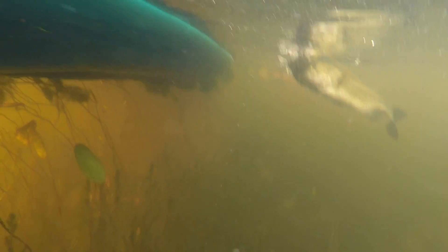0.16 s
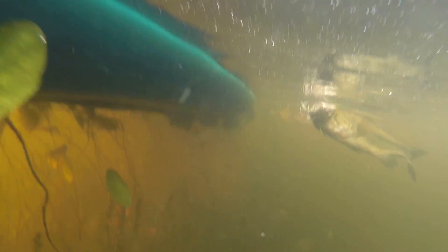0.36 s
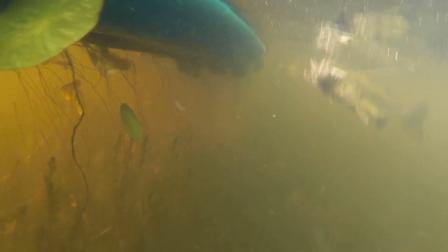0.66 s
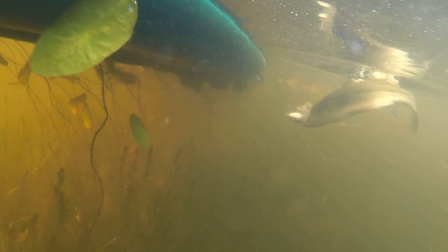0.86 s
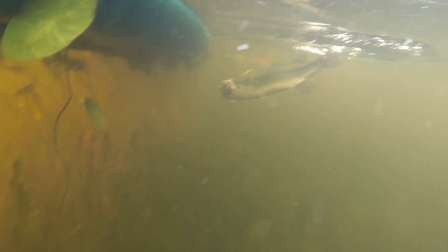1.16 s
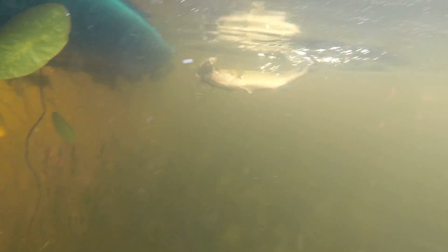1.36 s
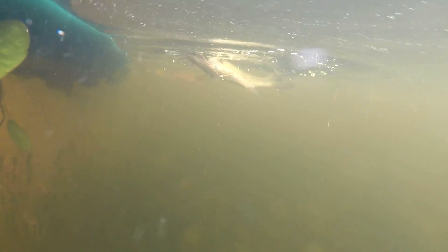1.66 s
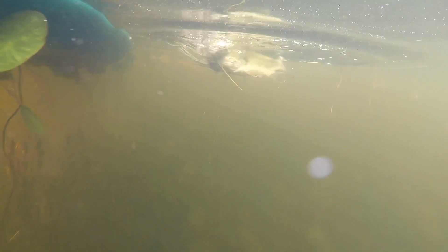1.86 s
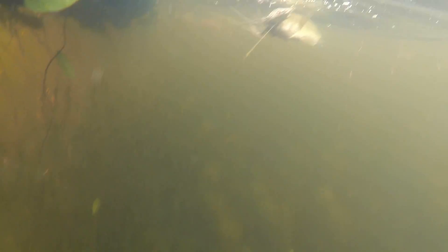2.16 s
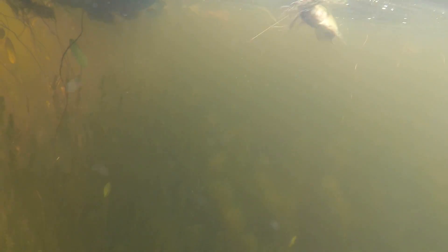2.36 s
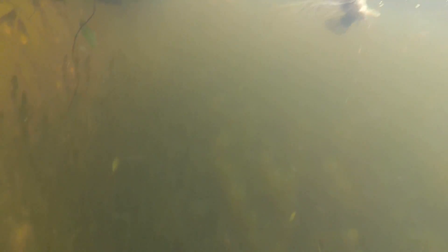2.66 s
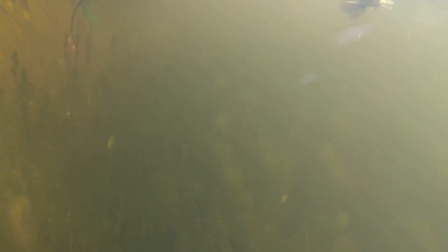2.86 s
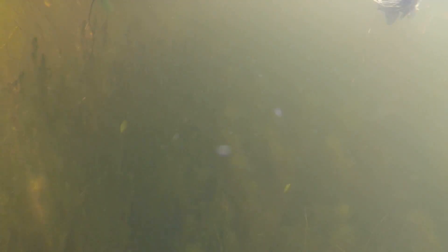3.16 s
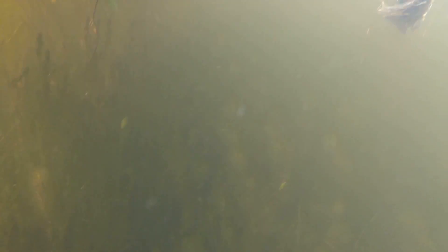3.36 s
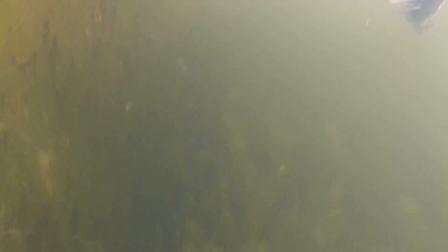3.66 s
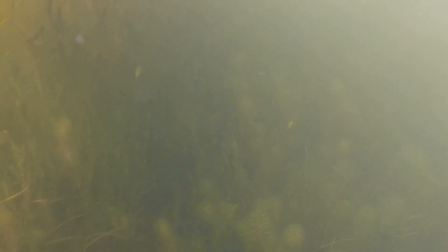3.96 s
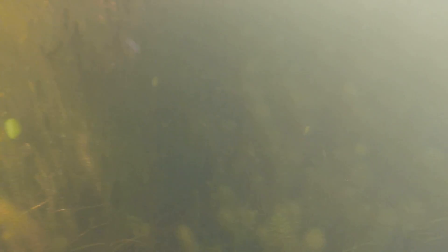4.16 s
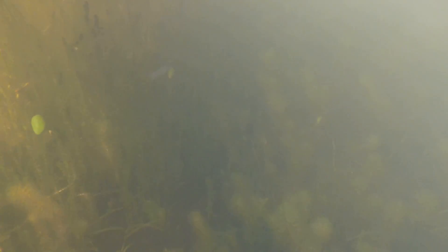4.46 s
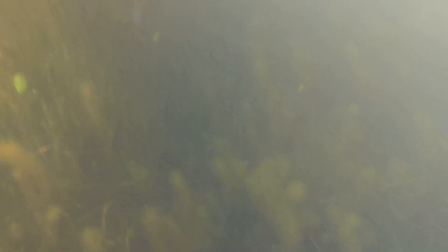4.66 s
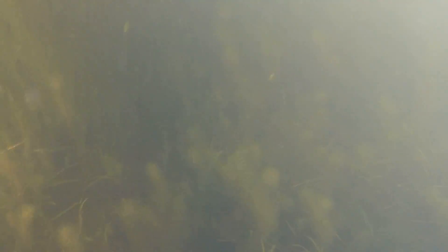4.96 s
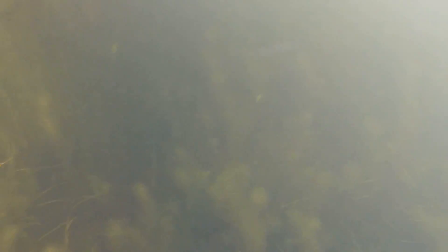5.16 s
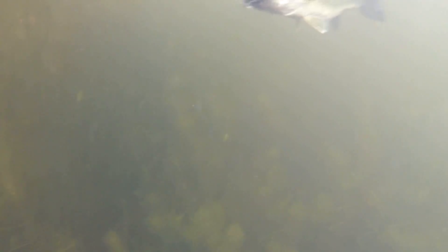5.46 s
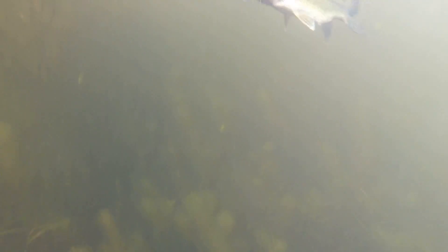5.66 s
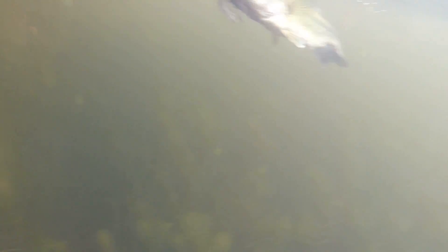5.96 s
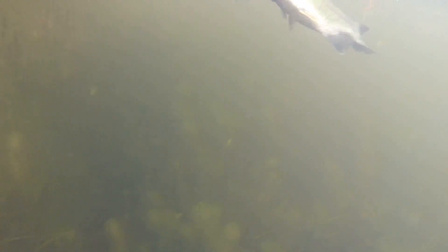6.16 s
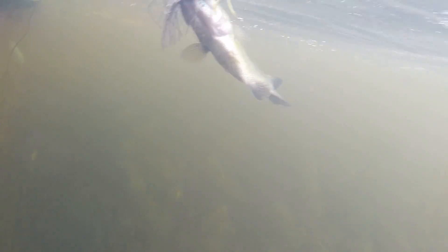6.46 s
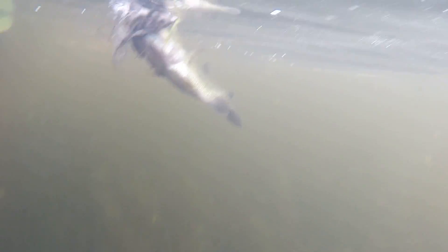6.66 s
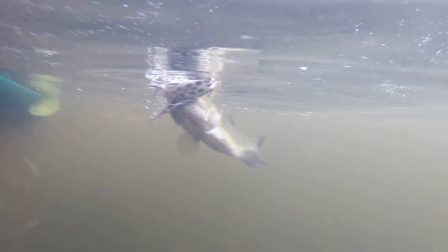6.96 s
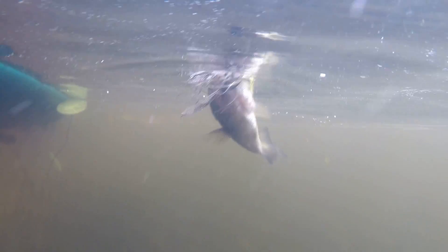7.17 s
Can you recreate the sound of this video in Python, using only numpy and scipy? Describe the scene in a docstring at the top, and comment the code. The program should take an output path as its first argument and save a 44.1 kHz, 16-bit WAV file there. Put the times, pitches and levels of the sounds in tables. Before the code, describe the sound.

A microphone sealed in a plastic housing just below a lake's surface, beside a kayak. A hooked fish thrashes at first with quick fizzy splashes, a hard click and chirping bubbles over low water rumble. It calms, then short ringing notches and sharp clicks rattle the housing, gurgles swirl, a hard snap rings, and a deep surge comes near the end.

```python
"""A camera in a plastic housing is held under a lake's surface beside a kayak while a hooked fish thrashes.
Throughout, eddies rumble past the housing (shaped noise) over faint hiss and a thin, throbbing whine.
Splashes fizz (swarms of tiny ringing bubbles with spray), hard clicks ring the housing, bubbles chirp,
gurgles swirl, surges rock it and soft knocks dent it; then the mount slips in short ringing notches.
Late on, faint ticks (damped modes) lead to one hard snap that rings on; a last deep surge follows."""
import sys
import numpy as np
from scipy import signal
from scipy.fft import rfft, irfft
from scipy.io import wavfile
from scipy.ndimage import uniform_filter1d

SR = 44100
rng = np.random.default_rng(int(sys.argv[2]) if len(sys.argv) > 2 else 0)


def store_pcm(level_fs):
    """Save levels as 16-bit WAV."""
    pcm = np.round(np.clip(level_fs, -1, 1) * 32767).astype(np.int16)
    wavfile.write(sys.argv[1], SR, np.atleast_2d(pcm).T)


N = 322841
T = np.arange(N) / SR  # time in the scene, s
AGE = np.arange(SR // 4) / SR  # time since an event began, s


def undb(db):
    """Amplitude ratio from level: 20 dB is a factor of ten."""
    return 10 ** (np.asarray(db) / 20)


def unit(x):
    """Normalization by the root mean square, to rms 1."""
    return x / np.sqrt(np.mean(x ** 2))


def add(out, s, x):
    """Linear superposition: sound x joins the mix at time s."""
    i = max(int(s * SR), 0)
    out[i:i + len(x)] += x[:max(len(out) - i, 0)]


def colour(x, points, tilt_db=0):
    """Spectral filtering: a curve over log frequency plus a tilt in dB per octave; rms 1."""
    octave = np.log2(np.maximum(np.fft.rfftfreq(len(x), 1 / SR), 1))
    hz, db = np.transpose(points)
    # the tilt starts at 256 Hz, octave 8
    gain_db = np.interp(octave, np.log2(hz), db) + tilt_db * np.maximum(octave - 8, 0)
    bass_cut = np.minimum(2 ** octave / hz[0], 1) ** 2  # 12 dB per octave below the first point
    return unit(irfft(rfft(x) * undb(gain_db) * bass_cut, len(x)))


def band(x, hz, width_hz):
    """Two-pole resonance: a band-pass whose Q is centre over width."""
    w = 2 * np.pi * hz / SR
    a = np.sin(w) * width_hz / hz / 2
    return signal.lfilter([a, 0, -a], [1 + a, -2 * np.cos(w), 1 - a], x)


def walk(rate):
    """Band-limited random drift: held noise, drawn rate times a second, smoothed by a moving mean."""
    k = max(int(SR / rate), 1)
    held = np.repeat(rng.standard_normal(N // k + 1), k)
    return uniform_filter1d(held, k)[:N]


def fade(t60):
    """Exponential decay: linear damping loses 60 dB in t60 seconds."""
    return np.exp(-np.log(1000) * AGE / t60)


def ring(hz, t60, glide=0):
    """One damped mode: a decaying sine whose pitch moves by the share glide over its t60."""
    bend = 1 + glide * np.minimum(AGE / t60, 1) / 2
    return fade(t60) * np.sin(2 * np.pi * hz * AGE * bend)


def push(contact):
    """Soft contact: a smooth pressure pulse that lasts contact seconds."""
    return np.sin(np.pi * np.minimum(AGE / contact, 1)) ** 2


def flow(rumble_db=6):
    """Turbulent pressure: eddies on the housing make a low rumble that follows its motion."""
    # push of the water past the housing: (time [s], level before rumble_db is added [dB])
    flow_push = [(0.0, -35), (0.51, -38), (0.67, -33.5), (0.81, -42.5), (2.1, -46), (2.42, -53.5),
                 (2.83, -47.5), (3.34, -51), (4.08, -44), (4.32, -42.5), (4.44, -37.5), (4.71, -45.5),
                 (5.36, -45.5), (5.75, -40.5), (6.16, -42.5), (6.63, -43), (6.77, -39.5), (7.32, -45.5)]
    # spectrum of the eddies: (frequency [Hz], relative level per Hz [dB])
    eddy_spectrum = [(8.8, -31.5), (15, 7), (27, 4.5), (37, -1.5), (51, -3), (119, -20.5), (226, -35.5),
                     (291, -34), (327, -36), (500, -42.5), (650, -64.5), (1100, -120)]
    eddies = colour(rng.standard_normal(N), eddy_spectrum)
    eddies /= np.sqrt(uniform_filter1d(eddies ** 2, size=SR // 8))  # even out the running rms
    return eddies * undb(rumble_db + np.interp(T, *np.transpose(flow_push)))


def floor(hiss_db=-57.5, whine_hz=13906, whine_db=-71, waver_hz=1, frame_hz=60, throb=0.63, swing=.45, fuzz_db=-78):
    """Modulation: over steady hiss, a thin whine throbs and swings in phase with every picture frame."""
    # spectrum of the hiss: (frequency [Hz], relative level per Hz [dB])
    hiss_spectrum = [(150, -84), (300, -88.5), (600, -91.5), (1000, -95), (2200, -100), (3200, -99),
                     (4300, -104.5), (5100, -102.5), (6200, -108), (9300, -111), (10200, -108),
                     (11800, -113), (13700, -111), (14500, -113)]
    hiss = undb(hiss_db) * colour(rng.standard_normal(N), hiss_spectrum)
    frame = 2 * np.pi * frame_hz * T
    carrier = 2 * np.pi * np.cumsum(whine_hz + waver_hz * walk(60)) / SR
    phase_swing = swing * np.sin(frame) + swing / 2 * np.sin(2 * frame)  # rad
    whine = unit(np.sin(carrier - phase_swing))
    fuzz = unit(band(band(rng.standard_normal(N), 13780, 1200), 13780, 1200))  # noise round the whine
    return hiss + (undb(whine_db) * whine + undb(fuzz_db) * fuzz) * (1 + throb * np.cos(frame))


def swarm(length, per_s, spread_db, cycles):
    """Bubble resonance: tiny bubbles of all sizes, each losing 60 dB in the given cycles."""
    when, pitch, size = rng.random((int(per_s * length / SR), 3)).T
    hz = 500 * 24 ** pitch  # 500 to 12000 Hz
    turns = hz[:, None] * AGE[AGE < .012]  # cycles since each bubble began
    strength = undb(spread_db * -np.log(0.014 + size)) * np.sqrt(hz)
    decay = np.exp(-np.log(1000) * turns / cycles)
    grains = strength[:, None] * decay * np.sin(2 * np.pi * turns)
    place = (when * length).astype(int)[:, None] + np.arange(turns.shape[1])
    return unit(np.bincount(place.ravel(), grains.ravel(), length)[:length])


def swells(table, spectrum, fizz):
    """Superposed bubbles and fine spray, swelling and fading, heard through the housing."""
    out = np.zeros(N)
    for s, length, db, tilt_db, rising in table:
        spray = colour(rng.standard_normal(len(AGE)), [(60, 1), (500, -6.5), (15000, -12)])
        water = swarm(len(AGE), per_s=3000, spread_db=3.5, cycles=16) + fizz * spray
        up_and_down = np.interp(AGE / length, [0, min(rising, 1), 1], [0, 1, 0])
        swell = np.sin(np.pi / 2 * up_and_down) ** 2
        add(out, s, undb(db) * swell * colour(water, spectrum, tilt_db))
    return out


def splashes():
    """Bubble noise: bright thrashing at the surface."""
    # (start [s], length [s], rms at the crest [dB], tilt [dB per octave], share of the length spent rising)
    splash_events = [(.015, 0.092, -37.5, 1.5, 0.52), (.08, 0.076, -41, 4, 0.38), (.19, 0.15, -47, 0, 0.4),
                     (.285, .15, -48, -1.5, 0.47), (.385, 0.093, -47.5, 0, .42),
                     (.528, 0.097, -34.5, 1, 0.47), (.582, 0.079, -35.5, 2, 0.36),
                     (.71, 0.23, -53.5, -0.5, 0.094), (3.085, 0.046, -41.5, -8, 0.59),
                     (4.4, 0.17, -58.5, 3, 0.24), (4.51, 0.072, -44.5, -.5, 0.67),
                     (4.85, 0.073, -52, 0.5, 0.35), (6.815, 0.044, -36.5, 0, .25),
                     (6.831, 0.081, -52, 1, 0.41)]
    # (frequency [Hz], relative level per Hz [dB])
    splash_spectrum = [(100, 4.5), (400, -7), (600, -1), (850, -1), (1100, -5.5), (1400, 0.5), (2000, -2),
                       (3100, -5.5), (3800, -13.5), (4400, -10.5), (5100, -10.5), (6000, -19.5),
                       (9500, -23), (15000, -47)]
    return swells(splash_events, splash_spectrum, fizz=0.76)


def click(db, hz, width_hz, crack_db=-11, crack_t60=0.0088, skirt_db=-28):
    """Modal excitation: a hard contact rings the whole housing; how it lands picks the loudest band."""
    # modes of the housing: (frequency [Hz], t60 [s], level before a random 2 dB either way [dB])
    housing_modes = [(600, 0.047, -14), (850, 0.009, -5), (1460, 0.008, -7), (1956, 0.0056, -5),
                     (2658, 0.0096, -5), (3122, 0.0046, -2), (4244, 0.005, -8.5), (5090, 0.0092, -10),
                     (6150, 0.0041, -9.5), (7260, 0.0038, -12), (10760, .005, -13), (12700, .004, -12.5)]
    t = AGE[AGE < .04]
    mode_hz, t60, mode_db = np.transpose(housing_modes)[:, :, None]
    louder, detune, side = rng.uniform(-1, 1, (3, len(housing_modes), 1))
    gain = undb(mode_db + 2 * louder) * np.sign(side)
    decay = np.exp(-np.log(1000) * t / t60)
    modes = gain * decay * np.sin(2 * np.pi * mode_hz * (1 + 0.019 * detune) * t)
    crack = undb(crack_db) * fade(crack_t60)[:len(t)] * rng.standard_normal(len(t))
    shell = modes.sum(axis=0) + crack
    favoured = unit(band(band(shell, hz, width_hz), hz, 2 * width_hz))
    skirt = undb(skirt_db) * unit(band(shell, 4000, 16000))
    x = favoured + skirt
    return undb(db) * x / np.sqrt(np.mean(x[t < .002] ** 2))  # db is the rms of the first 2 ms


def clicks():
    """Impact radiation: scattered sharp clicks on the handled housing, each over a hollow body."""
    # (time [s], rms of the first 2 ms [dB], centre [Hz], width [Hz], rms of the hollow body's first 2 ms [dB])
    click_events = [(.216, -40.5, 3870, 3000, -50), (.65, -19, 4700, 4460, -41),
                    (.8497, -48, 4360, 3000, -59), (1.064, -26, 1010, 690, -36.5),
                    (3.373, -44.5, 5470, 2000, -65), (3.398, -41.5, 5240, 2520, -58),
                    (3.455, -51, 4650, 3000, -68), (3.9034, -42, 2960, 1200, -60),
                    (3.9193, -23, 3400, 1780, -49), (3.94, -25, 1980, 1000, -37),
                    (3.9457, -35.5, 4500, 3950, -53), (4.85, -42.5, 3300, 5030, -44),
                    (4.964, -43.5, 3570, 1180, -60), (5.2978, -33.5, 7050, 6960, -35),
                    (5.3313, -37, 4340, 4000, -54), (5.3459, -26.5, 1550, 696, -42),
                    (5.3669, -31.5, 8000, 11100, -39), (5.3943, -36.5, 1700, 2500, -42),
                    (5.9038, -38.5, 950, 790, -54), (5.9138, -30, 3180, 2480, -36.5),
                    (6.095, -44, 3500, 3500, -49), (6.1297, -34, 6060, 3480, -51),
                    (6.131, -34.5, 1980, 1490, -52), (6.227, -47.5, 2600, 1800, -58),
                    (6.3821, -23.5, 2730, 636, -35), (6.6335, -38.5, 750, 1110, -49)]
    out = np.zeros(N)
    for s, db, hz, width_hz, body_db in click_events:
        add(out, s, click(db, hz, width_hz) + click(body_db, hz=1170, width_hz=1100))
    return out


def bubbles(rise_s=0.0037):
    """Volume resonance: single bubbles ring and chirp slightly upward."""
    # (time [s], level before the soft onset [dB], starting frequency [Hz], t60 [s])
    bubble_events = [(.488, -32, 925, 0.022), (1.203, -37, 1730, 0.057), (1.289, -38, 1710, .028),
                     (1.417, -36, 1520, .025), (2.677, -25, 1600, 0.007), (4.546, -32.5, 1860, .04),
                     (6.82, -35.5, 1839, .12), (6.845, -48, 1916, 0.16)]
    out = np.zeros(N)
    for s, db, hz, t60 in bubble_events:
        add(out, s, undb(db) * ring(hz, t60, glide=0.042) * (1 - np.exp(-AGE / rise_s)))
    return out


def gurgles():
    """Bubble noise: dull gurgles of water swirling round the housing."""
    # (start [s], length [s], rms at the crest [dB], tilt [dB per octave], share of the length spent rising)
    gurgle_events = [(.565, 0.049, -34, 2, 0.46), (1.2, 0.11, -51.5, -4, 0.58),
                     (1.685, .05, -41, -1.5, 0.26), (1.95, 0.058, -47, -8, .3),
                     (3.225, 0.13, -42.5, -7.5, 0.081), (4.21, 0.023, -34.5, 0.5, 0.46),
                     (4.32, 0.26, -44.5, 0.5, 0.61), (4.52, 0.057, -37, 3.5, 0.56),
                     (5.905, 0.14, -42.5, -5, 0.13), (6.815, 0.034, -32.5, -1.5, 0.22)]
    # (frequency [Hz], relative level per Hz [dB])
    gurgle_spectrum = [(110, 8.5), (300, -1.5), (480, -3), (660, -5), (850, -30), (2000, -19), (8000, -53)]
    return swells(gurgle_events, gurgle_spectrum, fizz=1.37)


def surges(rise_s=0.0011, t60=0.12, flex_ratio=2.44, flex_db=-12.5, flex_t60=0.066):
    """Damped oscillation: shoves of water rock the housing; its wall flexes too, higher and weaker."""
    # (time [s], level of the rocking before its onset and decay [dB], rocking frequency [Hz])
    surge_events = [(.577, -15, 45), (.719, -30, 104), (1.157, -33.5, 43), (1.587, -20, 39.5),
                    (3.232, -29, 150), (3.945, -21, 69.3), (4.556, -17, 54.3), (5.922, -24, 70),
                    (6.822, -6.5, 31)]
    out = np.zeros(N)
    for s, db, hz in surge_events:
        rocking = ring(hz, t60) + undb(flex_db) * ring(flex_ratio * hz, flex_t60)
        add(out, s, undb(db) * rocking * (1 - np.exp(-AGE / rise_s)))
    return out


def knocks(lowest_hz=608, shell_db=-23, flex_hz=125, flex_t60=0.032, flex_db=-10):
    """Elastic recoil: a soft blow dents the housing, which springs back and rings in its lowest mode."""
    # (time [s], push [dB], contact [s], ring [dB], ring t60 [s])
    knock_events = [(.6503, -38, 0.002, -31, .029), (0.7342, -24.5, 0.0034, -30.5, .023),
                    (1.5827, -13.5, .0028, -20, 0.041), (3.9404, -11.5, .0014, -14.5, 0.017),
                    (4.5481, -34, 0.00286, -20.5, 0.05), (5.3424, -13, 0.0036, -13.5, 0.021)]
    out = np.zeros(N)
    for s, db, contact, ring_db, t60 in knock_events:
        add(out, s, -undb(db) * push(contact))
        add(out, s + contact / 2, click(db + shell_db, hz=1250, width_hz=1000))
        add(out, s + 0.67 * contact, undb(ring_db) * ring(lowest_hz, t60))
        add(out, s + contact, undb(db + flex_db) * ring(flex_hz, flex_t60))  # the wall springs back
    return out


def notches(contact=0.00072, ring_t60=0.054, flex_hz=195, flex_t60=0.032, flex_db=-8,
            shell_db=-9, upper_db=-18.5, catch_s=0.0059, catch_db=-46):
    """Stick and slip: each slip of the mount shoves the housing, rings a note and catches with a tick."""
    # (time [s], push [dB], starting frequency of the ring [Hz], ring [dB])
    notch_events = [(1.0637, -52, 1300, -37.5), (3.1121, -28, 1314, -28.5), (3.3601, -28, 1190, -40.5),
                    (3.508, -29.5, 1273, -30.5), (3.6337, -27.5, 1315, -26), (3.7585, -24, 1275, -25.5),
                    (3.8475, -22.5, 1214, -40), (3.9483, -27, 1170, -35.5), (4.2326, -25, 1240, -31)]
    out = np.zeros(N)
    for s, db, hz, ring_db in notch_events:
        add(out, s, -undb(db) * push(contact))
        add(out, s + 2 * contact, undb(db + flex_db) * ring(flex_hz, flex_t60))  # the wall springs back
        shell = click(db + shell_db, hz=1150, width_hz=870)
        upper = click(db + upper_db, hz=2820, width_hz=600)
        add(out, s + contact / 2, shell + upper)
        add(out, s + 0.73 * contact, undb(ring_db) * ring(hz, ring_t60, glide=-0.03))
        add(out, s + catch_s, click(catch_db, hz=3700, width_hz=13000))
    return out


def ticking(tick_hz=4200, tick_width_hz=6000, spread_db=3):
    """Random impacts: faint uneven ticks as the grip shifts and the mount takes strain."""
    # (start [s], end [s], rate [ticks per s], middling rms of a tick's first 2 ms [dB])
    tick_spells = [(4.75, 5.05, 12, -52), (5.29, 5.314, 80, -44), (5.348, 5.38, 80, -41)]
    out = np.zeros(N)
    for start, end, per_s, db in tick_spells:
        for s in np.arange(start, end, 1 / per_s):
            louder, octaves = rng.uniform(-1.06, 1, 2)
            late_s = rng.random() / per_s / 2
            add(out, s + late_s, click(db + spread_db * louder, tick_hz * 2 ** octaves, tick_width_hz))
    return out


def snap(snap_s=5.4167, let_go_lead_s=0.0024, thud_lead_s=0.0007):
    """Sudden release: the mount lets go with a crack, hits its stop with thud and clack, and rings on."""
    # stiff part of the mount: (frequency [Hz], t60 [s], level [dB])
    mount_modes = [(1840, 0.13, -37), (2420, .08, -41), (2700, 0.05, -15), (2778, .045, -24),
                   (2720, 0.029, -11)]
    out = np.zeros(N)
    add(out, snap_s - let_go_lead_s, click(db=-20.0, hz=8900, width_hz=12000))
    add(out, snap_s - thud_lead_s, click(db=-16.5, hz=1500, width_hz=840))
    clack = click(db=-10.5, hz=2700, width_hz=2600) + click(db=-18.5, hz=11000, width_hz=3700)
    add(out, snap_s, clack)
    add(out, snap_s, sum(undb(db) * ring(hz, t60) for hz, t60, db in mount_modes))
    return out


def scene():
    """Superposition: every pressure adds at one microphone inside the housing."""
    water = flow() + splashes() + bubbles() + gurgles() + surges()
    handling = clicks() + knocks() + notches() + ticking() + snap()
    return (floor() + water + handling)[None]


def record(dry):
    """Band limiting and clipping: the camera thins the deepest bass, clips at full scale, cuts the top."""
    bass_cut = signal.butter(1, 8, "high", fs=SR, output="sos")
    top_cut = signal.ellip(8, .2, 70, 15500, fs=SR, output="sos")
    return signal.sosfilt(top_cut, np.clip(signal.sosfilt(bass_cut, dry), -1, 1))


dry = scene()
out = record(dry)
store_pcm(out)
```